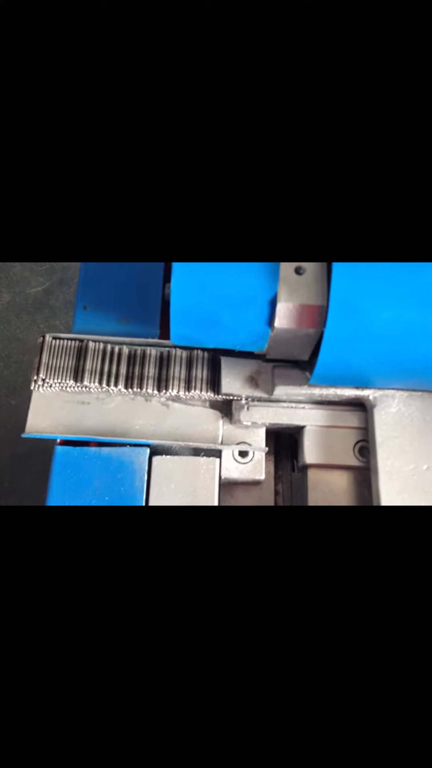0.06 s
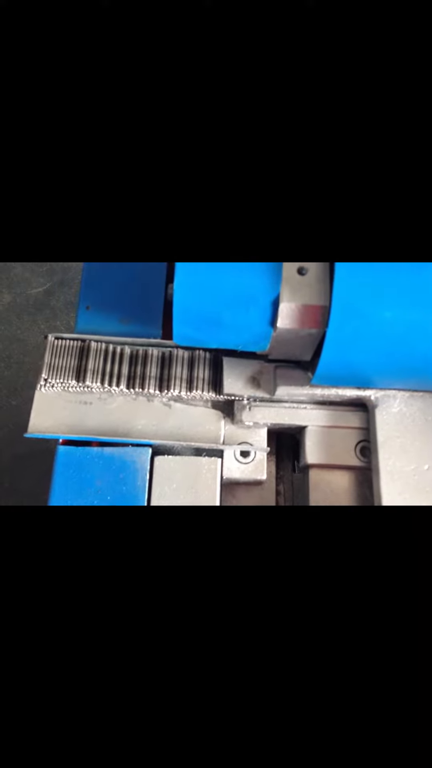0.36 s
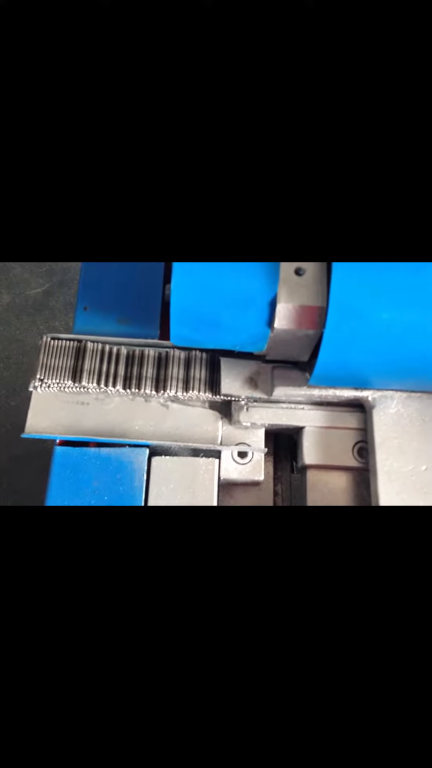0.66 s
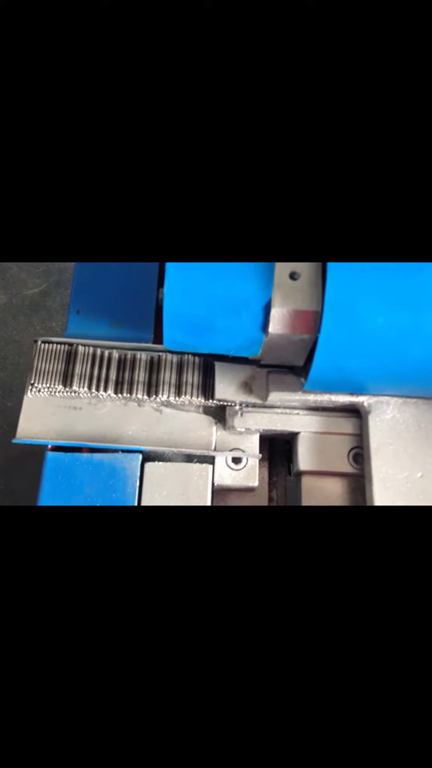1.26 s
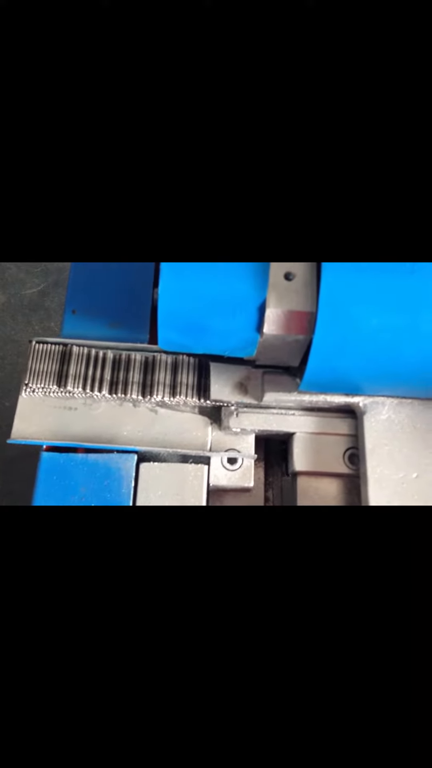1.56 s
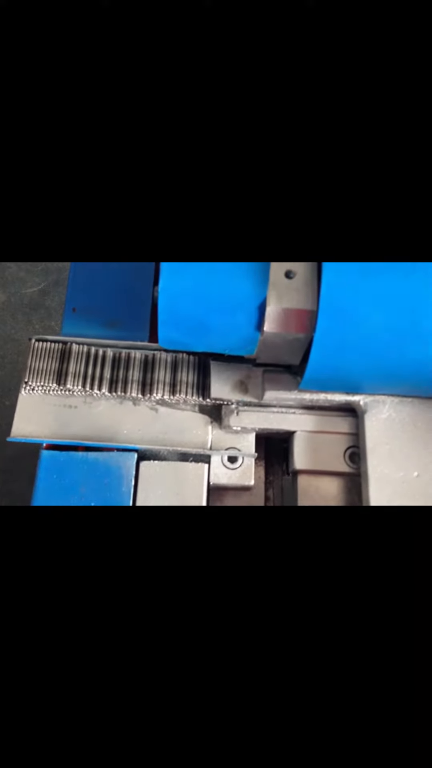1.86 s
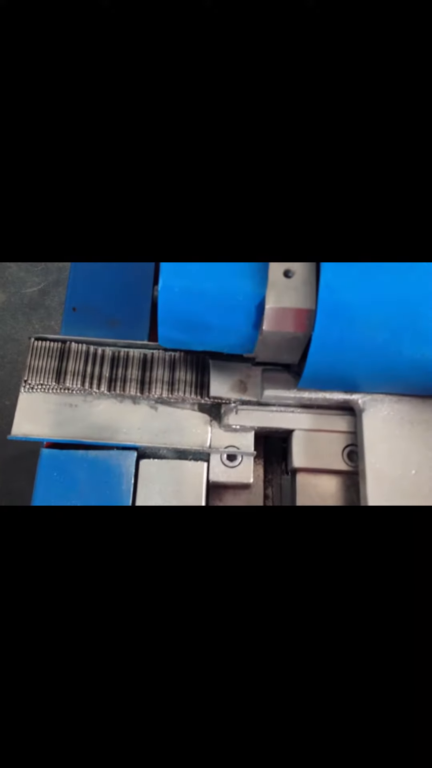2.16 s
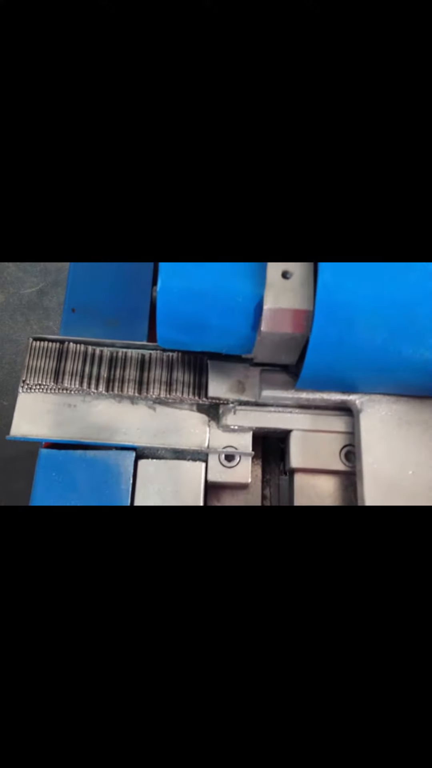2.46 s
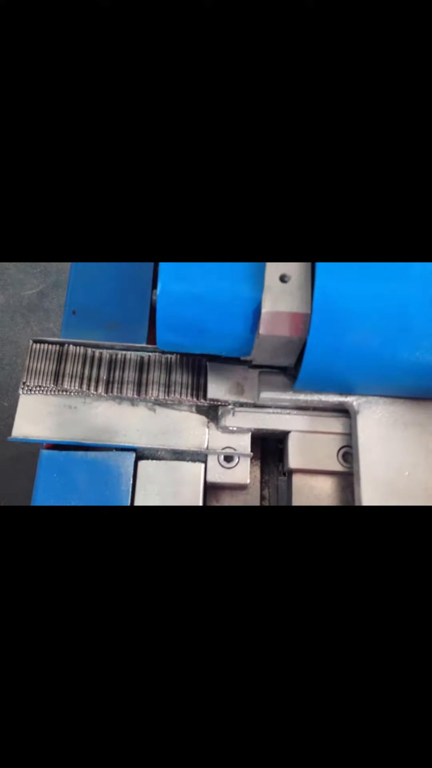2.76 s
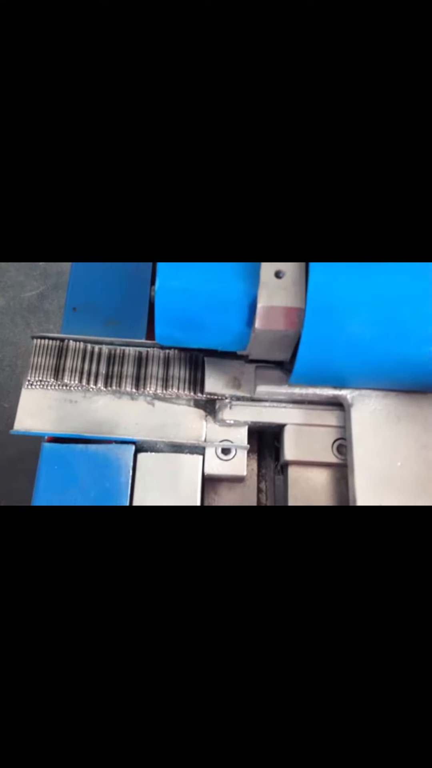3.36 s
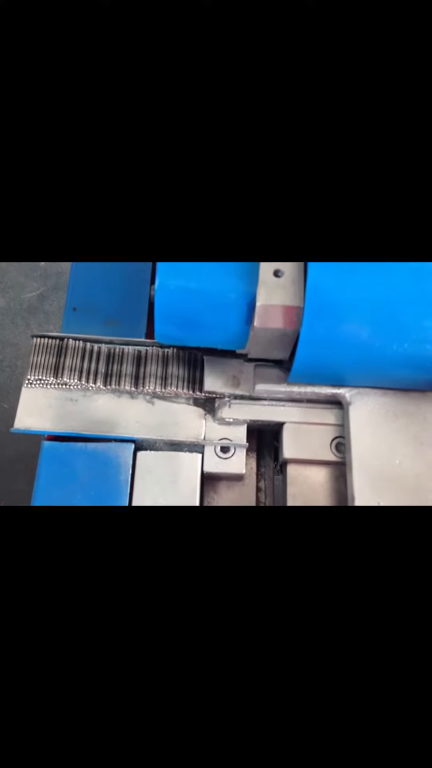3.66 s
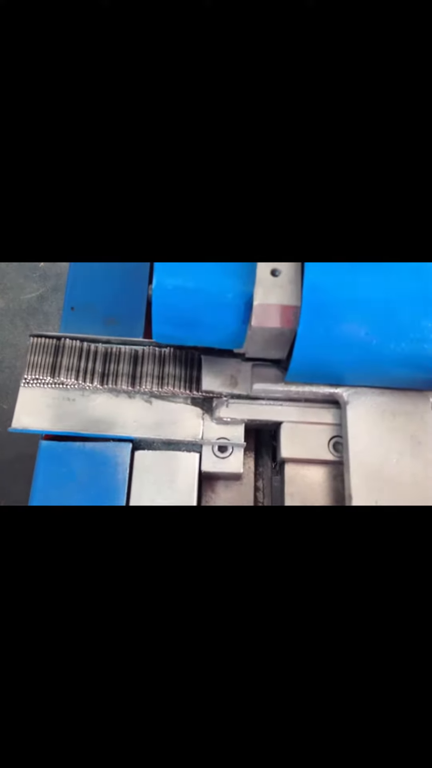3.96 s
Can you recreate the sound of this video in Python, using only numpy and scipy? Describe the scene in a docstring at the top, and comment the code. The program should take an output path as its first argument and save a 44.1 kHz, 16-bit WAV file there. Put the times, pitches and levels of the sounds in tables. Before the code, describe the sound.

Grinding machine rasping on metal needles, its shrill squeal pulsing rapidly over humming motors.

```python
"""A needle grinding machine runs steadily in a workshop, heard from close by.
Its wheel rasps and hisses on a row of needles and makes their holder ring.
Three spinning parts press and release a squeal, each at its own rate, so it beats into a fast,
chugging trill. A drive whines, motors hum, the frame knocks softly and the hall rumbles behind."""
import sys
import numpy as np
from scipy import signal
from scipy.fft import rfft, irfft
from scipy.io import wavfile

SR = 44100
rng = np.random.default_rng(int(sys.argv[2]) if len(sys.argv) > 2 else 0)


def master_out(mix):
    """Clip the mix to full scale and print it as 16-bit PCM to the path in sys.argv[1]."""
    frames = np.transpose(np.atleast_2d(mix))
    ceiling = np.clip(frames, -1, 1)
    pcm = np.round(ceiling * 32767).astype(np.int16)
    wavfile.write(sys.argv[1], SR, pcm)


N = 176400
TIME = np.arange(N) / SR
WHEEL_HZ, FAST_SHAFT_HZ, SLOW_SHAFT_HZ = 55.16, 65.6, 48.63  # turns per second


def grinding(clock, pressure_db, mains_hz=50):
    """The wheel rasps on the needles, their holder rings and the grit hisses, all louder when pressed."""
    # Ringing of the holder and housing. Each row: pitch in Hz, width in Hz, level in dB.
    ring_notes = [(191.6, 30, -39.5), (497.6, 18, -39), (1592, 41, -30.5), (1942, 50, -30.5),
                  (2017, 87, -23.5), (2353, 114, -25.5), (3176, 120, -29), (3392, 160, -26),
                  (3567, 78, -30), (3845, 45, -28.5)]
    # Tone colours of the rasp and the hiss. Each row: frequency in Hz, relative level in dB.
    rasp_colour = [(100, -46), (900, -25), (1350, -12), (1470, -2), (1750, -1), (1900, 0), (2170, -2),
                   (2550, -4), (2780, 7), (2980, -1.5), (3500, -6), (3700, -3), (4100, -6), (4600, -11.5),
                   (5300, -17.5), (8000, -36)]
    hiss_colour = [(100, -45), (3000, -18), (4500, -1), (5100, -2.5), (5500, 0.5), (7000, -.5),
                   (8200, -2.5), (9000, -5), (11300, -6.5), (13500, -10), (15000, -13)]
    turn = cycle(WHEEL_HZ, clock).real
    mains = cycle(mains_hz, TIME)
    rings = sum(from_db(db) * resonance(hz, width) for hz, width, db in ring_notes)
    rings *= 1 + 0.28 * turn
    rasp = from_db(-17) * noise(rasp_colour) * (1 + 0.064 * turn)
    # The hiss pulses with the wheel and with the buzz of the motor's electric supply.
    pulsing = 1 + 0.083 * turn + 0.085 * mains.real + 0.06 * (mains ** 2).real
    hiss = from_db(-24 + pressure_db) * room(noise(hiss_colour)) * pulsing
    return room(rings + rasp) * from_db(0.68 * pressure_db) + hiss


def squeal(pitch_hz, holder_hz=2713, holder_width_hz=30, scrape_lag_s=0.004):
    """Each spinning part swells the squeal once a turn; it chirps loudest when they press together."""
    # Spinning parts that press on the needles. Each row: turns per second, time of the first press
    # in seconds, swell in dB, how far the squeal's wave is pulled back in radians.
    spinning_parts = [(WHEEL_HZ, .0077, 6.8, .3), (FAST_SHAFT_HZ, .0092, 6.2, .1),
                      (SLOW_SHAFT_HZ, .0155, 2.8, .1)]
    swell_db = 0
    phase = 2 * np.pi * np.cumsum(pitch_hz) / SR
    for rate, first_s, depth_db, sag in spinning_parts:
        angle = 2 * np.pi * rate * (TIME - first_s)
        swell_db += depth_db * np.cos(angle)
        phase -= sag * np.sin(angle)
    waver = 1 + 0.15 * flutter(rate_hz=5)
    tone = from_db(swell_db) * (np.exp(1j * phase) * waver).real
    # The squeal sounds through the holder, and a scrape follows each press.
    holder_filter = signal.iirpeak(holder_hz, holder_hz / holder_width_hz, fs=SR)
    holder = signal.lfilter(*holder_filter, tone)
    late_swell_db = np.interp(TIME - scrape_lag_s, TIME, swell_db)
    scrape = from_db(0.55 * late_swell_db) * resonance(hz=2825, width_hz=120)
    return from_db(-18.8) * unit_power(holder) + from_db(-25.5) * unit_power(scrape)


def drive(clock, base_hz=404.8):
    """The drive whines in rough overtones that throb along with the trill."""
    # Each row: multiple of the base pitch, level in dB, roughness (0 is smooth).
    overtones = [(3, -40.5, 0.98), (4, -24.5, 0.58), (5, -24.5, 0.25), (6, -33, 1)]
    whine = 0
    for multiple, db, roughness in overtones:
        waver = 1 + roughness * flutter(rate_hz=14.4)
        throb = 0.27 * cycle(FAST_SHAFT_HZ - WHEEL_HZ, clock).real
        tone = (waver + throb) * cycle(multiple * base_hz, clock)
        whine += from_db(db) * unit_power(tone.real)
    return whine


def motors(steady_part=0.6):
    """Motors and bearings hum in wavering tones."""
    # Each row: pitch in Hz, level in dB, rate of wavering in Hz.
    hum_notes = [(199.6, -39, 2.5), (396, -40.5, 2.7), (621, -40, 11.4), (794.4, -41.5, 4),
                 (813.6, -43.5, 3.4), (849, -44, 6), (1153, -44, 3), (1205, -40.5, 1), (1550, -47, 5.4),
                 (2372, -64, 7), (3400, -69, 5), (3826, -35.5, 6.1)]
    hum = 0
    for hz, db, waver_hz in hum_notes:
        tone = (steady_part + flutter(waver_hz)) * cycle(hz, TIME)
        hum += from_db(db) * unit_power(tone.real)
    return hum


def knocks(rise_s=0.017):
    """Dull bumps in the frame swell quickly and die away."""
    # Each row: start in seconds, peak level in dB.
    bumps = [(0.273, -23), (1.15, -26.5), (2.58, -30.5)]
    level = 0
    for start_s, db in bumps:
        age = np.maximum(TIME - start_s, 0) / rise_s
        level += from_db(db) * age * np.exp(1 - age)
    return level * resonance(hz=283, width_hz=380)


def rumble():
    """The low noise of the machine and the hall swells and sinks."""
    # Tone colour of the rumble. Each row: frequency in Hz, relative level in dB.
    hall_colour = [(25, -28), (60, -29), (88, -20), (118, -12.5), (150, -1.5), (280, 0), (440, -3),
                   (700, -4), (1000, -6.5), (1200, -2.5), (1500, -9), (3000, -26.5)]
    # Its rise and fall. Each row: time in seconds, relative level in dB.
    swells = [(0.0, -25.5), (0.27, -25), (0.29, -25), (0.34, -27), (1.46, -24.5), (2.13, -27),
              (2.71, -24.5), (3.15, -26), (3.48, -24.5), (3.51, -29.5), (3.63, -25.5), (4.0, -27)]
    level_db = curve(swells)
    return from_db(-26.5 + level_db - level_db.mean()) * room(noise(hall_colour))


def room(sound, fade_s=0.3, echo_db=-13):
    """The workshop adds dense echoes to a sound that is already running."""
    tail = rng.standard_normal(N) * from_db(-60 * TIME / fade_s)
    echoes = irfft(rfft(sound) * rfft(tail / np.linalg.norm(tail)), N)
    return (sound + from_db(echo_db) * echoes) / np.sqrt(1 + from_db(echo_db) ** 2)


def resonance(hz, width_hz):
    """Rubbing noise that rings in a narrow band around one pitch."""
    r = np.exp(-np.pi * width_hz * np.sqrt(2) / SR)
    band = [1 - r, 0, r - 1, 1, -2 * r * np.cos(2 * np.pi * hz / SR), r * r]
    ringing = signal.sosfilt([band, band], rng.standard_normal(N + SR))
    return unit_power(ringing[SR:])


def noise(colour):
    """Noise with the given tone colour, at a power of 1."""
    hz, db = np.transpose(colour)
    all_hz = np.maximum(np.fft.rfftfreq(N, 1 / SR), 1)
    gains = from_db(np.interp(np.log(all_hz), np.log(hz), db))
    return unit_power(irfft(rfft(rng.standard_normal(N)) * gains, N))


def drift(rate_hz):
    """Slow random wandering, about 1 in size."""
    step, warm_up = 40, 2000  # one point every 40 samples; the first points are dropped
    r = np.exp(-2 * np.pi * step * rate_hz / SR)
    jitter = rng.standard_normal(N // step + warm_up + 2)
    slow = signal.lfilter([1], [1, -2 * r, r * r], jitter)[warm_up:]
    return np.interp(np.arange(N) / step, np.arange(len(slow)), unit_power(slow))


def flutter(rate_hz):
    """Random wavering of a wave's strength and timing."""
    return (drift(rate_hz) + 1j * drift(rate_hz)) / np.sqrt(2)


def cycle(hz, clock):
    """A rotation from a random angle; its .real part is a plain wave."""
    return np.exp(2j * np.pi * (hz * clock + rng.random()))


def curve(rows):
    """Join (time, value) points with straight lines."""
    return np.interp(TIME, *np.transpose(rows))


def from_db(db):
    """Turn decibels into a multiplier."""
    return 10 ** (np.asarray(db) / 20)


def unit_power(x):
    """Scale to an average power of 1."""
    return x / np.sqrt(np.mean(np.abs(x) ** 2) + 1e-20)


def scene():
    """The machine, wandering a little in speed and pressure, and the hall around it."""
    # Machine speed, heard as the squeal's pitch. Each row: time in seconds, pitch in Hz.
    pitch_points = [(0, 2816.5), (1.4, 2820), (1.85, 2817.5), (2.45, 2822.5), (3.0, 2819), (4, 2821)]
    # Grinding pressure, heard as the hiss's level. Each row: time in seconds, relative level in dB.
    pressure_points = [(0.0, -22), (0.1, -23.5), (1.16, -22.5), (1.19, -21.5), (1.21, -23), (1.28, -21.5),
                       (1.4, -22.5), (1.64, -21.5), (1.66, -25), (1.99, -22), (2.17, -24.5), (2.27, -22.5),
                       (2.41, -25), (2.62, -22), (2.94, -22), (3.53, -25), (3.78, -22), (4.0, -24.5)]
    pitch_hz = curve(pitch_points) * (1 + 0.00022 * drift(rate_hz=1.56))
    speed = 1 + 0.78 * (pitch_hz / pitch_hz.mean() - 1)
    clock = np.cumsum(speed) / SR  # time that runs faster when the machine does
    pressure_db = curve(pressure_points)
    pressure_db = pressure_db - pressure_db.mean() + 0.9 * drift(rate_hz=18)
    tones = (squeal(pitch_hz) + drive(clock)) * from_db(0.31 * pressure_db)
    return (tones + grinding(clock, pressure_db) + motors() + rumble() + knocks())[None]


def record(dry, cutoff_hz=15300):
    """The tallest peaks are rounded off and the highest treble is cut."""
    rounded = dry / (1 + (dry / 0.95) ** 8) ** (1 / 8)
    treble_cut = signal.ellip(12, 0.1, 90, cutoff_hz, fs=SR, output="sos")
    return signal.sosfilt(treble_cut, rounded)


dry = scene()
out = record(dry)
master_out(out)
```